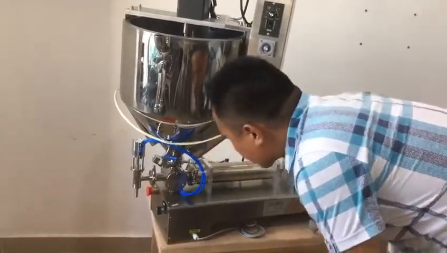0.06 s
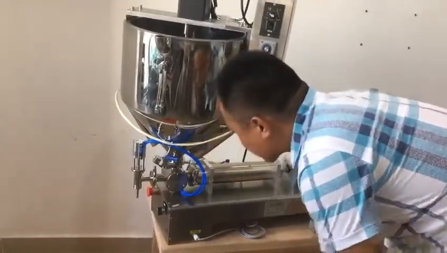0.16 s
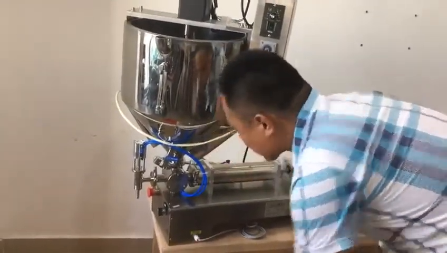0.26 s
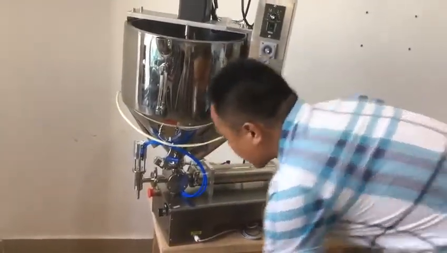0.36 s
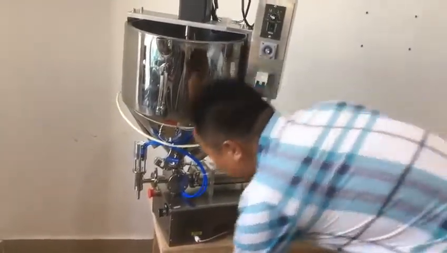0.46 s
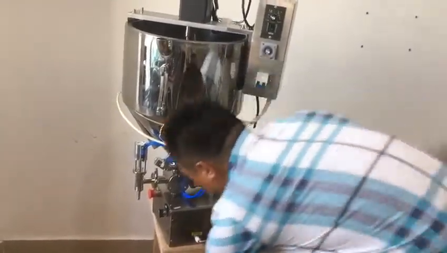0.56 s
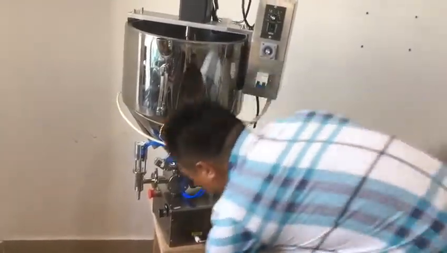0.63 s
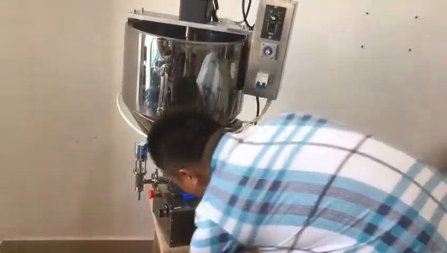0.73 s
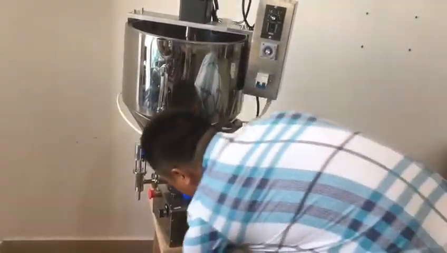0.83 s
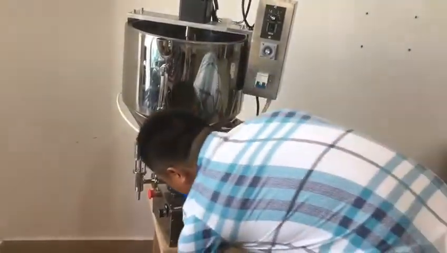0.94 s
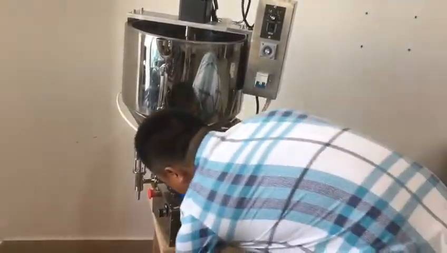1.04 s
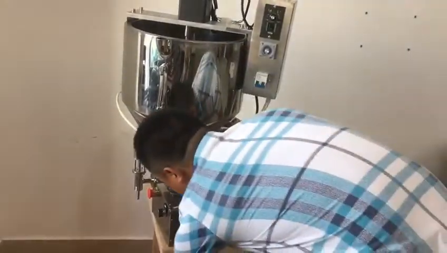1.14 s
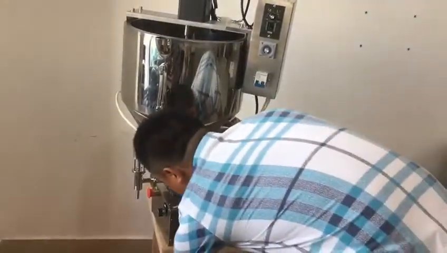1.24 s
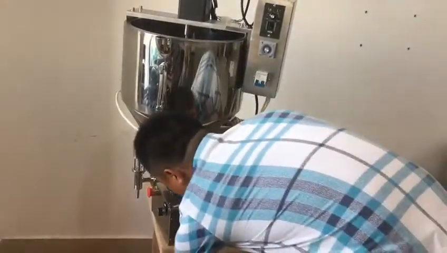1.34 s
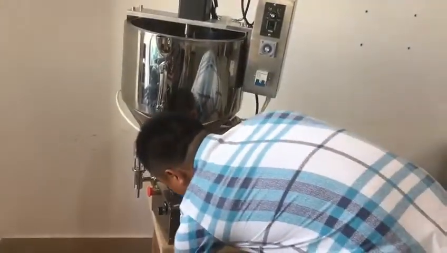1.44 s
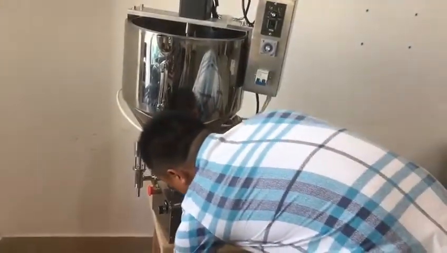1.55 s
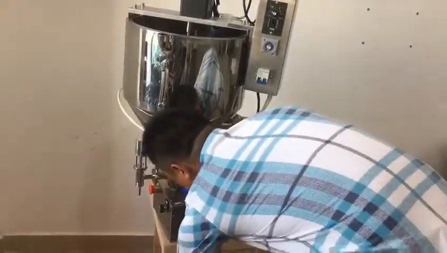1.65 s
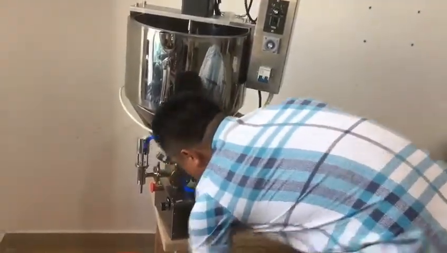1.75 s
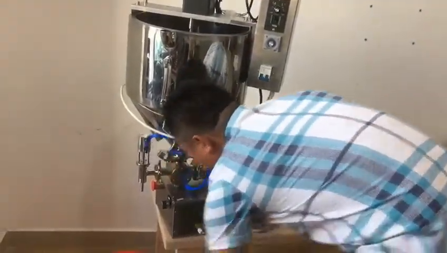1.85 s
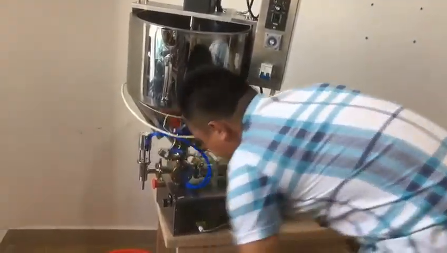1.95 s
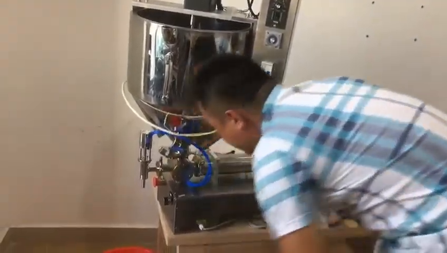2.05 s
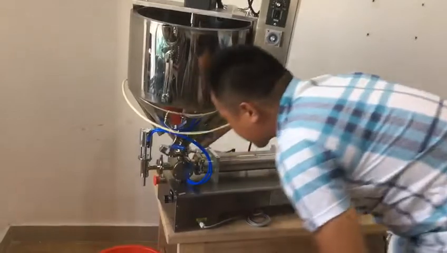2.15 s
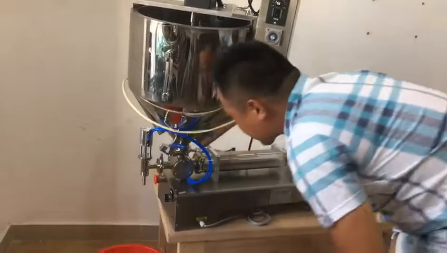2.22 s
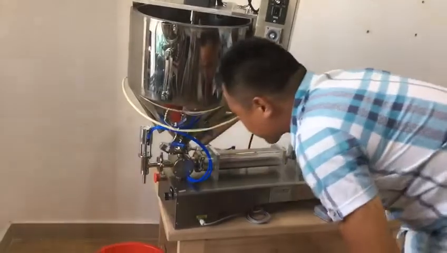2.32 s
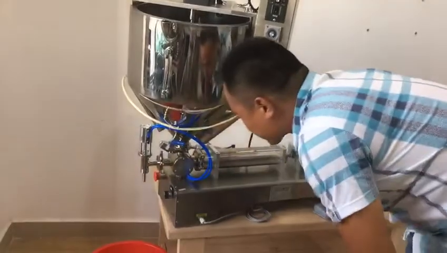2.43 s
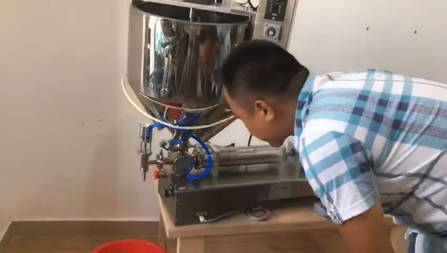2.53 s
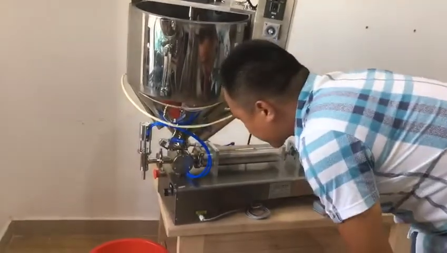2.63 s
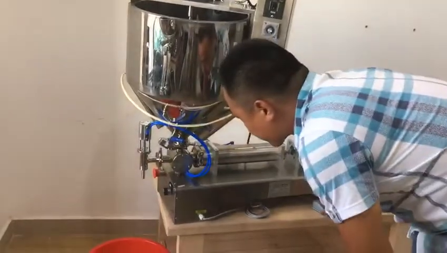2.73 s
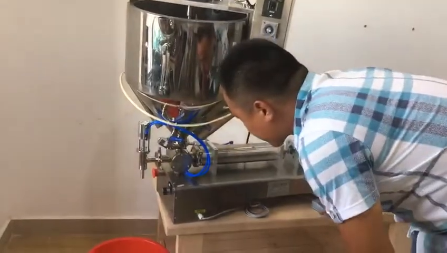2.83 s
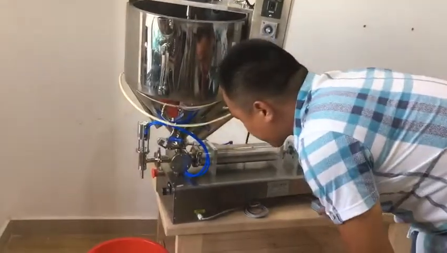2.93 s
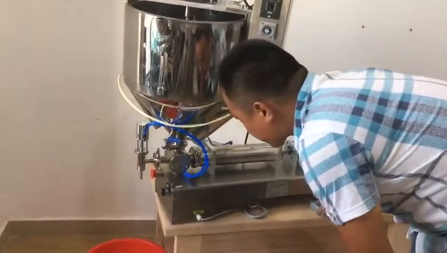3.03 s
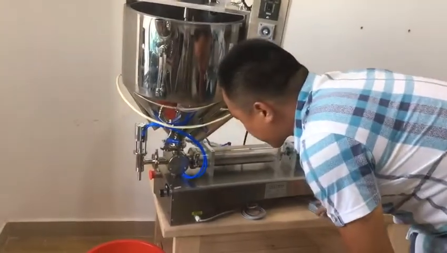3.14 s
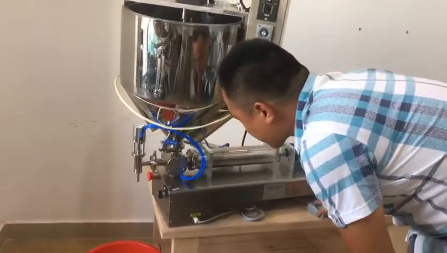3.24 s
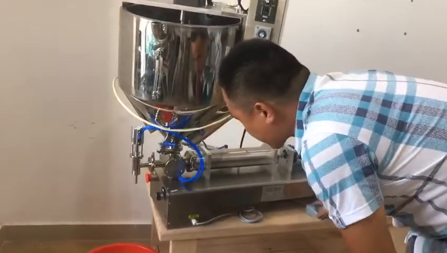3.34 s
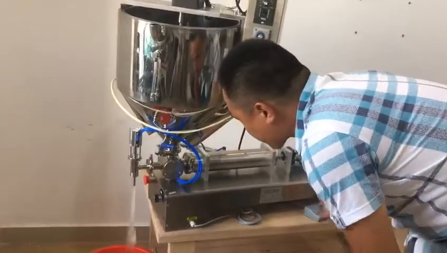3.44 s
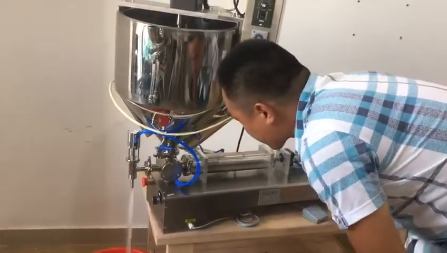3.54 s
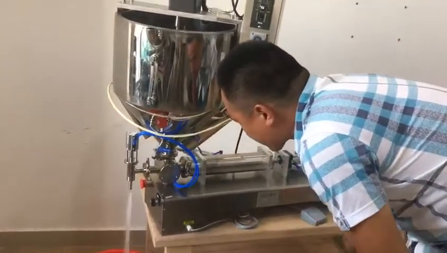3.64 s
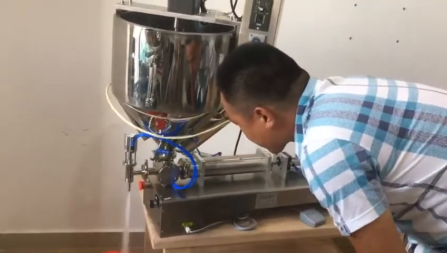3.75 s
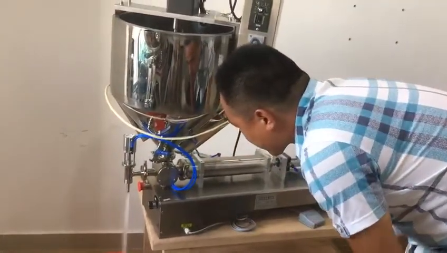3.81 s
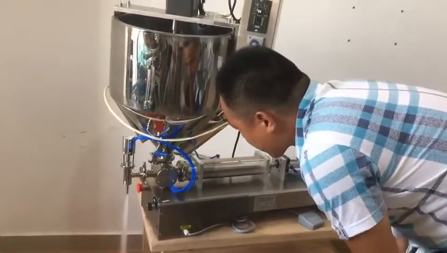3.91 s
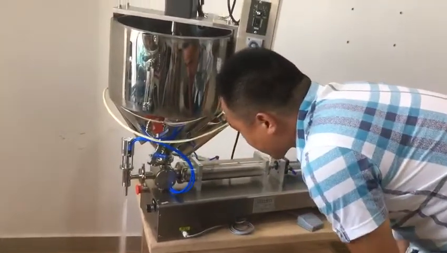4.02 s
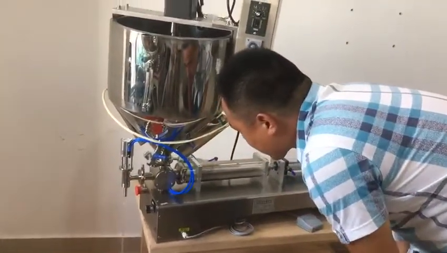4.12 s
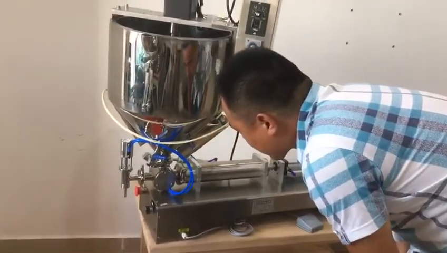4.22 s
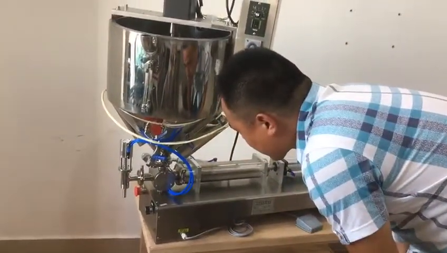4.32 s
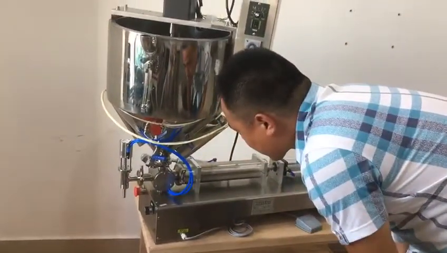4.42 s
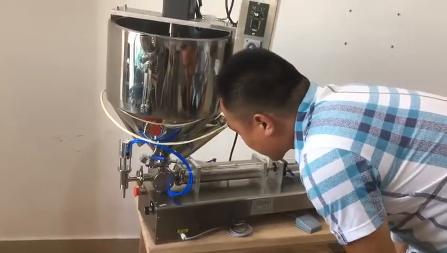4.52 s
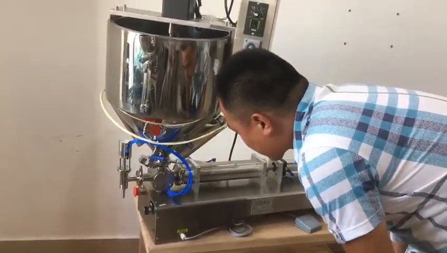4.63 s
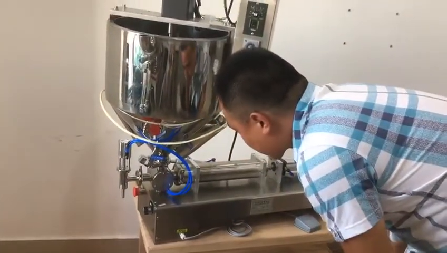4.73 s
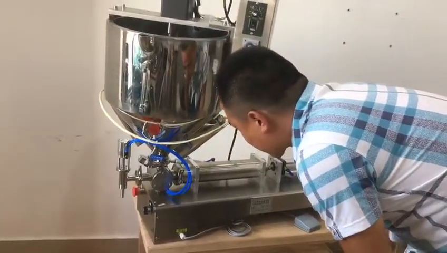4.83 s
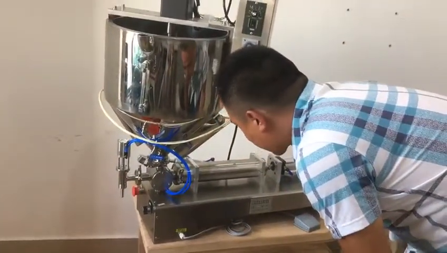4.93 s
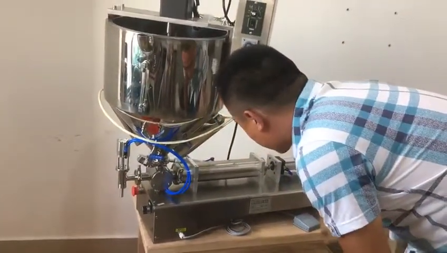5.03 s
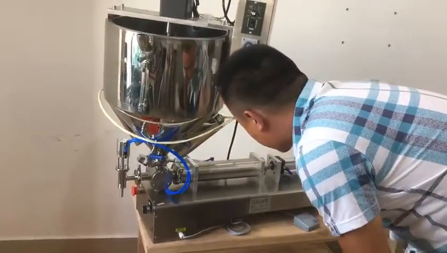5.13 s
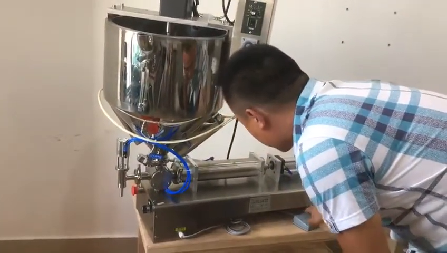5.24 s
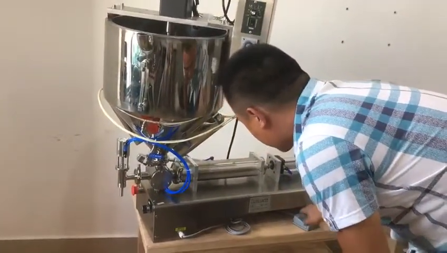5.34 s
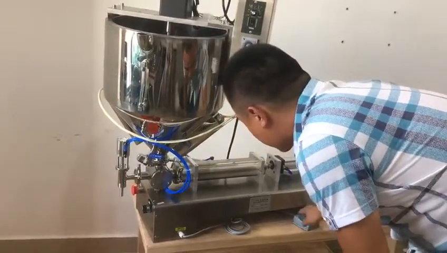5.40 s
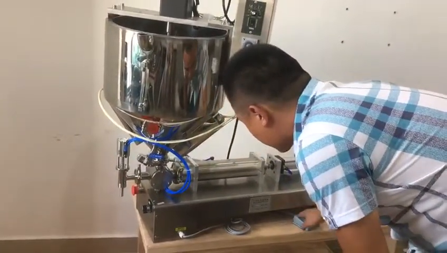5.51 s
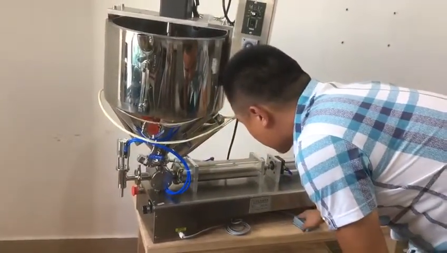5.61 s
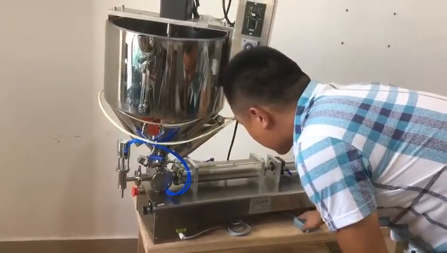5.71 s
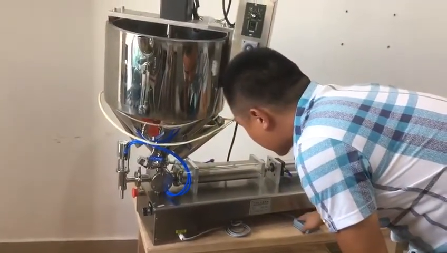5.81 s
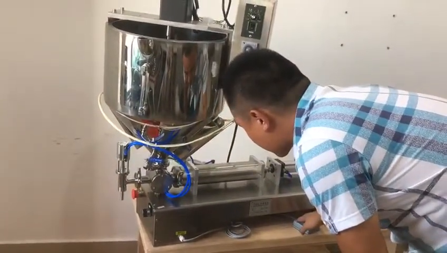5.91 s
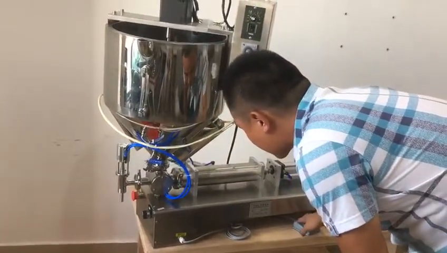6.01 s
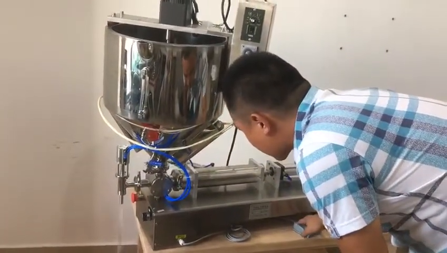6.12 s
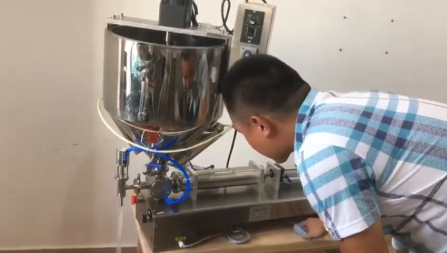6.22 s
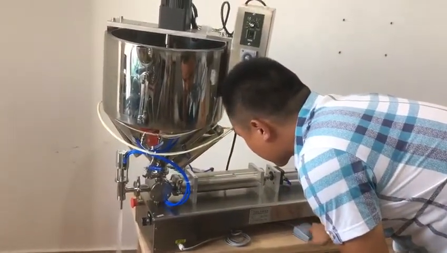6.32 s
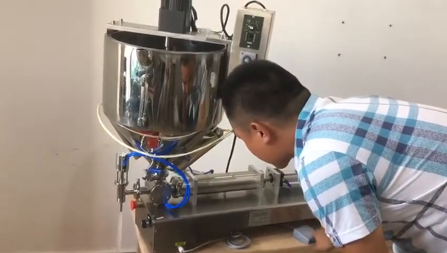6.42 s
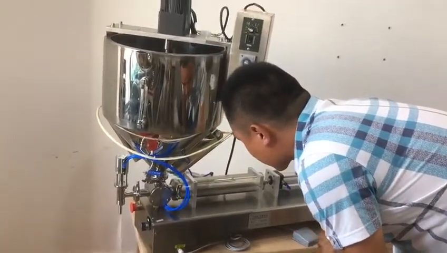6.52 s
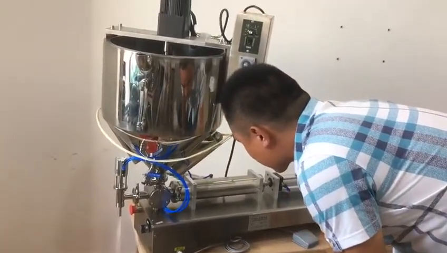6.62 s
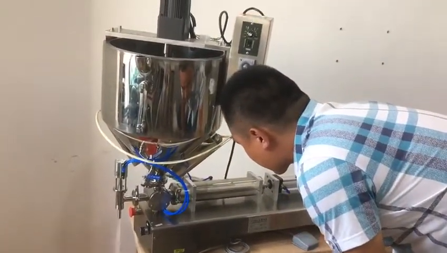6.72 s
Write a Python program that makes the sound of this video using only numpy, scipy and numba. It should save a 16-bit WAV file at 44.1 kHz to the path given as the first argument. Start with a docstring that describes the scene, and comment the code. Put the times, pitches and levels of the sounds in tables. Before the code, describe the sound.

In a bare, reverberant room with a low steady murmur, a plastic bucket bumps hollowly on the floor and a metal fitting clinks. A pedal clicks, compressed air blasts, and a valve slams with a metallic ring. Air hisses, then a short water jet booms and gulps into the bucket. After a quiet pause with dull knocks, the cycle repeats. The microphone is a few steps away.

```python
"""A bare, echoing room with an air-driven piston filler; a plastic bucket bumps down and something metal clinks.
Twice a pedal clicks, the air valve fires with a blast and the rotary valve slams: filtered noise and ringing modes.
The cylinder then hisses (coloured noise) while a water jet plunges into the bucket: a wobbling low tone booms,
rising sines gulp, and thousands of tiny chirps make splash and spray. The building murmurs steadily underneath."""
import sys
import numpy as np
from scipy import signal
from scipy.fft import rfft, irfft, next_fast_len
from scipy.io import wavfile
from numba import njit

SR = 44100
rng = np.random.default_rng(int(sys.argv[2]) if len(sys.argv) > 2 else 0)


def persist_wave(psi):
    """Save psi, clipped to +-1, as 16-bit WAV."""
    counts = np.round(np.clip(psi, -1, 1) * 32767).astype(np.int16)
    wavfile.write(sys.argv[1], SR, np.atleast_2d(counts).T)


N = 298201
T = np.arange(N) / SR
AGE = T[:SR]  # time since a blow, in seconds

# Levels are relative, within each layer. Ring time (t60) is the time to fall by 60 dB.
# water jet, one row a shot: start t/s, length/s, boom level/dB, splash level/dB, spray level/dB
JET_SHOTS = [(3.569, .66, -21, -22.5, -36.5), (6.3, .68, -18.5, -26, -39)]
# the biggest air pockets collapse under the jet: t/s, starting pitch f/Hz, level/dB, t60/s
GULPS = [(3.794, 270.2, -6, 0.16), (3.947, 268, -15, 0.11), (4.030, 248, -13.5, 0.087),
         (4.105, 274, -12.5, 0.14), (4.219, 269.7, -17, 0.2), (4.375, 276, -21, 0.17),
         (6.370, 285, -11.5, 0.13), (6.461, 307, -5, 0.068), (6.516, 306, -3.5, 0.075),
         (6.538, 295, -9.5, 0.053), (6.703, 280, -8, 0.18)]
# air spits out of the nozzle with the water: start t/s, length/s, level/dB
SPITS = [(3.585, 0.03, -38), (3.775, 0.023, -37.5), (4.05, 0.097, -31.5), (6.288, 0.024, -33.5)]
# resonances of the bucket's hollow: f/Hz, width/Hz, level/dB
HOLLOW_PEAKS = [(165, 7.9, 2.5), (220, 25, -9.5), (277.1, 18, 10.5), (309.4, 9.3, 0.5), (350, 36, 8.5)]
# resonances in the splash: f/Hz, width/Hz, level/dB
SPLASH_PEAKS = [(616, 59, 4), (827, 60, -4), (979, 22, 0), (1070, 19, -2)]
# splash spectrum: f/Hz, level/dB
SPLASH_SPECTRUM = [(45, -52), (95, -24), (160, -5), (400, 4), (500, -2), (620, 0), (1000, 1), (1400, -1.5),
                   (2000, -8), (3000, -13.5), (9000, -40)]
# spectrum of spray, also used for the last puff of air: f/Hz, level/dB
SPRAY_SPECTRUM = [(1200, 7), (2500, 1.5), (5000, 0), (7500, 0.5), (10000, 1.5), (12000, -3)]
# piston travels (push, return, push): start t/s, length/s, broad rush level/dB, throttle hiss level/dB
TRAVELS = [(3.024, 1, -34.5, -39), (4.243, 0.57, -44, -37.5), (5.89, 0.88, -34, -41)]
# rushing air spectrum: f/Hz, level/dB
RUSH_SPECTRUM = [(80, -15), (300, 3.5), (500, -13), (700, -1.5), (2000, 1.5), (2800, 1.5), (3900, 3),
                 (5000, -3), (7000, -9.5), (10000, -23.5), (12000, -17.5)]
# throttle hiss spectrum: f/Hz, level/dB
THROTTLE_SPECTRUM = [(200, -17), (700, -12.5), (1900, 5.5), (2900, -3.5), (4000, -1), (7000, -3.5),
                     (9000, -7.5), (10200, -28.5), (11200, -9.5), (12200, -34.5)]
# resonances of the throttle's narrow passages: f/Hz, width/Hz, level/dB
THROTTLE_PEAKS = [(3590, 130, 4.6), (3700, 41, 2.4), (4430, 170, 8.6), (4700, 60, 3), (5430, 180, 5.8),
                  (5730, 60, 4), (6130, 140, 3.5), (6870, 130, 7.1), (8700, 60, 4.5)]
# low modes of the table: f/Hz, level/dB, t60/s
TABLE_MODES = [(78, -6.5, 0.4), (95.4, -3.5, 0.27)]
# air valve fires: t/s, lead of the first leak/s, blast level/dB, clack level/dB, ping f/Hz, ping level/dB
VALVE_SHOTS = [(3.008, .010, -24.5, -24.5, 2004, -27), (5.878, .006, -24, -26.5, 2024, -21.5)]
# blast of air spectrum: f/Hz, level/dB
BLAST_SPECTRUM = [(200, 0), (700, -1.5), (1500, -4.5), (2800, -5), (3900, 1), (4800, -4), (5700, 1.5),
                  (7700, -7), (9400, -2.5), (11000, -1.5), (12500, -13.5)]
# resonances in the blast; the first two also colour the rush: f/Hz, width/Hz, level/dB
BLAST_PEAKS = [(2013, 49, 1.5), (3728, 50, 1.5), (4200, 79, -1), (5360, 120, -5), (9200, 300, 0),
               (11050, 200, -5)]
# air valve clack spectrum: f/Hz, level/dB
VALVE_CLACK_SPECTRUM = [(55, -18), (90, 7), (140, -5), (280, 2.5), (400, -4), (500, -19.5), (680, -3),
                        (1000, -5.5), (1500, -7), (2100, -4.5), (4000, -14.5), (11000, -43)]
# rotary valve hits its stop: t/s, level/dB
SLAMS = [(3.155, -11), (6.021, -10.5)]
# slam spectrum: f/Hz, level/dB
SLAM_SPECTRUM = [(50, -27.5), (120, -6.5), (175, -1.5), (260, 3), (390, 2.5), (480, -12.5), (680, -1.5),
                 (1700, -4), (2500, -9.5), (4800, -16), (9000, -11), (12000, -23.5)]
# sharp crack of the slam, spectrum: f/Hz, level/dB
CRACK_SPECTRUM = [(1000, -8), (5000, -12.5), (6800, 2), (9000, -8.5), (12000, -22)]
# modes of the steel frame: f/Hz, level/dB, t60/s
FRAME_MODES = [(119.5, -6, 0.36), (239.3, 1, 0.41), (267, -5, 0.45), (292.6, -4, 0.51), (363, -11.5, 0.54),
               (407, -11.5, .75), (665, -11, 0.49), (755, -16.5, 0.25), (1165, -20.5, 0.24),
               (1690, -3.5, .26), (1782, -28, .4), (2375, -18.5, 0.4), (2740, -23.5, .26),
               (3560, -9.5, .21)]
# pedal switch clicks: t/s, level/dB
PEDAL_CLICKS = [(2.970, -37), (5.825, -43)]
# modes of the pedal's case: f/Hz, level/dB, t60/s
PEDAL_MODES = [(1040, -2.5, .12), (1110, -3.5, .2), (2010, -11, 0.12), (2680, -12, 0.16)]
# the pedal's spring squeaks: start t/s, length/s, pitch f/Hz, level/dB
SQUEAKS = [(5.741, 0.066, 2299, -57.5), (6.6, 0.1, 2600, -64), (5.737, .13, 2900, -68)]
# bucket bumps on the floor: t/s, level/dB, hollow boom level/dB, brightness in dB per octave
BUMPS = [(0.807, -45.5, 1, 3.5), (.837, -33, -1.5, 0.5), (.869, -23, 0.5, -1), (.886, -33.5, 1.5, 0.5),
         (.985, -43, 3, 0), (1.543, -23.5, 3.5, 1.5), (1.560, -23.5, 3.5, 0.5), (1.648, -31.5, -1, -1),
         (1.815, -44.5, 5, 4)]
# bump spectrum: f/Hz, level/dB
BUMP_SPECTRUM = [(50, -19), (130, 5), (300, 3), (430, -4.5), (750, -1.5), (1100, -1.5), (1700, -8),
                 (3000, -20), (5000, -31), (11000, -48)]
# modes of the bucket: f/Hz, level/dB, t60/s
BUCKET_MODES = [(146.5, -14.5, 0.48), (206.8, -5.5, 0.62), (265.6, 0, 0.43), (284.6, -1.5, 0.49),
                (331.5, -10.5, 0.4), (598, -20, 0.69), (730, -15, 0.61), (853, -27, 0.5)]
# plastic clacks: t/s, level/dB, brightness in dB per octave
CLACKS = [(1.408, -28, -1), (1.432, -36, -11)]
# plastic clack spectrum: f/Hz, level/dB
CLACK_SPECTRUM = [(80, -22), (200, -4.5), (290, 3), (420, -18), (560, -8), (850, -10), (1020, 6),
                  (1280, -7.5), (1600, -15.5), (2400, -19.5), (4000, -39), (11000, -59)]
# soft dull knocks: t/s, level/dB
KNOCKS = [(1.256, -44.5), (5.259, -39.5), (5.281, -43), (5.35, -46.5)]
# knock spectrum: f/Hz, level/dB
KNOCK_SPECTRUM = [(90, -2), (200, 8), (330, 5), (470, -6), (650, 2.5), (950, -3), (1300, -17),
                  (2500, -28.5), (8000, -35)]
# faint sharp ticks of handling: t/s, level/dB
TICKS = [(1.185, -50.5), (1.496, -48), (1.745, -50), (1.818, -53), (1.915, -45), (2.204, -43), (5.662, -56)]
# tick spectrum: f/Hz, level/dB
TICK_SPECTRUM = [(800, -15), (3000, 4), (5000, -7), (11000, -16.5)]
# modes of the clinking metal: f/Hz, level/dB, t60/s
CLINK_MODES = [(1240, -11, 0.23), (1254, -7, .4), (2400, 3.5, 0.089), (2420, -1, 0.25), (2490, -6, 0.32),
               (2530, -12, 0.47), (3660, -15, 0.44), (3700, -10, 0.35), (3750, -14, 0.33),
               (6170, -15, 0.062)]
# the shirt rustles with each move: start t/s, length/s, level/dB
RUSTLES = [(.08, .25, -59), (0.445, .08, -69), (0.735, .24, -64), (1.574, .15, -59), (2.077, .08, -59.5),
           (2.356, .07, -58.5)]
# cloth spectrum: f/Hz, level/dB
CLOTH_SPECTRUM = [(1000, 6.5), (3000, 2), (7000, -5.5), (11000, -13)]
# murmur of the building, spectrum: f/Hz, level/dB
AMBIENT_SPECTRUM = [(15, -47), (25, -29), (49, -0.5), (118, -5.5), (197, -3), (323, -11), (555, -16),
                    (682, -15), (906, -12.5), (979, -13.5), (1170, -14.5), (2360, -26), (4990, -40.5),
                    (9510, -41), (12000, -50), (15600, -79.5), (22000, -120)]

# the jet builds up, then thins out; the boom fades slowest
JET_RISE_S, SPLASH_RISE_S = 0.046, 0.081
BOOM_FALL_DB_PER_S, SPLASH_FALL_DB_PER_S, SPRAY_FALL_DB_PER_S = 67, 83, 72
BOOM_GROWTH_DB_PER_S = 6.5  # the cavity deepens while the jet runs
SPIT_RISE_S, SPIT_FALL_DB_PER_S = 0.035, 253
# the cavity's pitch climbs and settles as the bucket fills
SHALLOW_HZ, DEEP_HZ, SETTLE_S = 185, 308.5, .42
# the rush comes at once and sags; the throttle hisses as the piston gathers speed
RUSH_RISE_S, RUSH_SAG_DB_PER_S, HISS_RISE_S, AIR_FALL_DB_PER_S = 0.023, 4, 0.37, 74
# the last air escapes after the return
PUFF_S, PUFF_LENGTH_S, PUFF_DB = 4.965, 0.048, -49
PUFF_RISE_S, PUFF_FALL_DB_PER_S = 0.022, 171
THUD_S, THUD_DB = 4.078, -34.5  # low thud around the end of the first push
SLAM_BUILD_CYCLES = 5
CLINK_S, CLINK_DB = 2.202, -35.5
RUSTLE_RISE_S, RUSTLE_FALL_DB_PER_S = 0.053, 48
AMBIENT_DB = -49.5
ROOM_T60_S, ROOM_DAMP = 0.85, 0.2  # damping: how much faster each higher octave dies
TOP_HZ = 11900


def water(boom_db=-6, hollow_db=-8, splash_db=0.0, spray_db=-2, wobble_hz=52):
    """The jet digs a throbbing cavity that sounds the bucket's hollow; small bubbles splash and droplets spray."""
    booming, splashing, spraying, cavity_hz = jet()
    # the cavity keeps changing size, so its pitch wobbles fast
    pitch = cavity_hz + wobble_hz * walk(190)
    tone = np.sin(2 * np.pi * np.cumsum(pitch) / SR)
    cavity = unit(amp(3.8 * walk(70)) * tone)
    hz = np.fft.rfftfreq(N, 1 / SR)
    hollow = unit(irfft(rfft(cavity) * resonate(HOLLOW_PEAKS, hz), N))
    out = room(booming * (amp(boom_db) * cavity + amp(hollow_db) * hollow), -9)

    for s, gulp_hz, db, t60 in GULPS:
        onset = (1 - np.exp(-AGE / 0.0031)) ** 2
        rising_tone = np.sin(2 * np.pi * gulp_hz * AGE * (1 + 0.32 * AGE))
        add(out, s, 2 * amp(db) * onset * fade(t60) * rising_tone)

    splash = bubbles(348, 4430, count=9000, cycles=18.8, spread_db=3.5, glide=0.2)
    splash = room(splash * amp(2.4 * walk(35)), 1)
    out += amp(splash_db) * splashing * colour(splash, SPLASH_SPECTRUM, SPLASH_PEAKS)

    spray = bubbles(1800, 12500, count=20000, cycles=6.2, spread_db=3, glide=0.11)
    spray = colour(spray, SPRAY_SPECTRUM)
    return out + amp(spray_db) * room(spraying * amp(1.5 * walk(30)) * spray, 1)


def jet():
    """Strength of boom, splash and spray through the shots, and the cavity's pitch as the water deepens."""
    boom = splash = spray = poured_s = 0
    for s, length, boom_db, splash_db, spray_db in JET_SHOTS:
        boom_swell = swell(s, length, JET_RISE_S, BOOM_FALL_DB_PER_S, BOOM_GROWTH_DB_PER_S)
        splash_swell = swell(s, length, SPLASH_RISE_S, SPLASH_FALL_DB_PER_S)
        splash_swell = splash_swell * np.clip((T - s) / SPLASH_RISE_S, 0, 1)  # a gentler start
        boom = boom + amp(boom_db) * boom_swell
        splash = splash + amp(splash_db) * splash_swell
        spray = spray + amp(spray_db) * swell(s, length, JET_RISE_S, SPRAY_FALL_DB_PER_S)
        poured_s = poured_s + np.clip(T - s, 0, length)
    for s, length, db in SPITS:
        spray = spray + amp(db) * swell(s, length, SPIT_RISE_S, SPIT_FALL_DB_PER_S)
    cavity_hz = DEEP_HZ + (SHALLOW_HZ - DEEP_HZ) * np.exp(-poured_s / SETTLE_S)
    return boom, splash, spray, cavity_hz


def bubbles(low_hz, high_hz, count, cycles, spread_db, glide):
    """Bubbles at random moments, a few much stronger than the rest; high ones start louder but die sooner."""
    when, pitch, luck = rng.random((count, 3)).T
    hz = low_hz * (high_hz / low_hz) ** pitch
    size = hz / low_hz * amp(-spread_db * np.log(np.maximum(luck, .01)))
    start = (when * N).astype(np.int64)
    return chirps(start, hz, size, float(max(cycles, 1)), float(glide))


@njit
def chirps(start, hz, size, cycles, glide):
    """Decaying sines that rise in pitch by the fraction glide, each some cycles long."""
    out = np.zeros(N)
    for k in range(len(hz)):
        life = cycles * SR / hz[k]  # in samples
        turn = 2 * np.pi * hz[k] / SR
        z = size[k] + 0j
        step = np.exp(1j * turn - np.log(200) / life)  # turns and shrinks z
        rise = np.exp(1j * turn * glide / life)  # speeds up the turning
        for i in range(start[k], min(N, start[k] + int(life))):
            z *= step
            step *= rise
            out[i] += z.imag
    return out


def cylinder():
    """Air rushes out as the piston travels and hisses in the throttle's narrow passages; then a thud and a puff."""
    rush = hiss = 0
    for s, length, rush_db, hiss_db in TRAVELS:
        rush_swell = swell(s, length, RUSH_RISE_S, AIR_FALL_DB_PER_S, -RUSH_SAG_DB_PER_S)
        rush = rush + amp(rush_db) * rush_swell
        hiss = hiss + amp(hiss_db) * swell(s, length, HISS_RISE_S, AIR_FALL_DB_PER_S)
    air = rush * noise(RUSH_SPECTRUM, peaks=BLAST_PEAKS[:2])
    air = air + hiss * noise(THROTTLE_SPECTRUM, peaks=THROTTLE_PEAKS)
    puff = swell(PUFF_S, PUFF_LENGTH_S, PUFF_RISE_S, PUFF_FALL_DB_PER_S)
    puff = amp(PUFF_DB) * puff * noise(SPRAY_SPECTRUM)
    out = amp(-4.0) * room(air * amp(1.4 * walk(23)), 1.8) + room(puff, -2)
    add(out, THUD_S, amp(THUD_DB) * ring(TABLE_MODES, 0.0066))
    return out


def valves(blast_hold_s=.19, blast_t60=1.6, vent_t60=.4, leak_db=-16, frame_db=-2, crack_db=1):
    """The spool clacks and dumps the actuator's air; then the rotary valve slams and shakes the steel frame."""
    out = np.zeros(N)
    for s, leak_s, blast_db, clack_db, ping_hz, ping_db in VALVE_SHOTS:
        # the port leaks just before it opens fully; pressure sags, then runs out
        opening = np.where(AGE < leak_s, amp(leak_db), 1)
        venting = np.exp(-np.log(1000) * np.maximum(AGE - blast_hold_s, 0) / vent_t60)
        pressure = fade(blast_t60) * venting
        blast = opening * pressure * noise(BLAST_SPECTRUM, size=SR, peaks=BLAST_PEAKS)
        add(out, s - leak_s, amp(blast_db) * blast)
        # the spool rings in three close modes
        ping = ring([(ping_hz * ratio, 0, .27) for ratio in (.982, 1, 1.02)], 0.00091)
        clack = clatter(VALVE_CLACK_SPECTRUM, .3, 0, build_cycles=1.0)
        add(out, s + 0.00205, amp(clack_db) * clack + amp(ping_db) * ping)
        add(out, s, amp(clack_db - 6.5) * ring(TABLE_MODES, .006))  # the kick shakes the table
    for s, db in SLAMS:
        crack = amp(crack_db) * fade(0.02) * noise(CRACK_SPECTRUM, size=SR)
        body = clatter(SLAM_SPECTRUM, 0.4, -11.5, build_cycles=SLAM_BUILD_CYCLES)
        frame = amp(frame_db) * ring(FRAME_MODES, 0.021)
        add(out, s, amp(db) * (crack + body + frame))
    return out


def pedal(tick_db=-12):
    """The spring squeaks as a wavering sine; the switch snaps over and rings its case."""
    out = np.zeros(N)
    for s, length, hz, db in SQUEAKS:
        rub = np.clip(AGE / .006, 0, 1) * np.exp(-np.maximum(AGE - length, 0) / .012)
        tone = np.sin(2 * np.pi * hz * AGE + .6 * walk(60)[:SR])
        add(out, s, amp(db + 2 * walk(70)[:SR]) * rub * tone)
    for s, db in PEDAL_CLICKS:
        tick = amp(tick_db) * clatter(TICK_SPECTRUM, 0.04, -9.5)
        add(out, s, amp(db) * (ring(PEDAL_MODES, .0006) + tick))
    return out


def handling(boom_build_s=0.0066, bump_t60=0.22, bump_room_db=-10, clack_room_db=-5):
    """Blows make the bucket bump and boom, plastic clack and a metal fitting clink; cloth rustles as noise."""
    out = np.zeros(N)
    for s, db, boom_db, tilt_db in BUMPS:
        bump = clatter(BUMP_SPECTRUM, bump_t60, bump_room_db, tilt_db, build_cycles=0.57)
        boom = amp(boom_db) * ring(BUCKET_MODES, boom_build_s)
        add(out, s, amp(db) * (bump + boom))
    for s, db, tilt_db in CLACKS:
        add(out, s, amp(db) * clatter(CLACK_SPECTRUM, 0.14, clack_room_db, tilt_db, build_cycles=0.47))
    for s, db in KNOCKS:
        add(out, s, amp(db) * clatter(KNOCK_SPECTRUM, 0.23, -8.5, build_cycles=0.48))
    for s, db in TICKS:
        add(out, s, amp(db) * clatter(TICK_SPECTRUM, 0.033, -16))
    clink = np.zeros(N)
    add(clink, CLINK_S, amp(CLINK_DB) * ring(CLINK_MODES, 0.00083))
    out += room(clink, -8.5)
    moves = 0
    for s, length, db in RUSTLES:
        moves = moves + amp(db) * swell(s, length, RUSTLE_RISE_S, RUSTLE_FALL_DB_PER_S)
    return out + moves * amp(3.5 * walk(60)) * noise(CLOTH_SPECTRUM)


def murmur():
    """The building's steady murmur: coloured noise whose level drifts slightly."""
    return amp(AMBIENT_DB) * amp(.5 * walk(3.3)) * noise(AMBIENT_SPECTRUM)


def room(x, wet_db):
    """Direct sound plus the diffuse answer of bare walls."""
    tail = clatter([(100, 5.5), (3000, -3.5), (12000, -2.0)], 0.15, -7.5)
    return x + amp(wet_db) * signal.fftconvolve(x, tail / np.linalg.norm(tail))[:N]


def clatter(spectrum, t60, room_db, tilt_db=0, build_cycles=2):
    """Countless modes of a struck body: highs die first, lows build up late, and the room holds a tail."""
    hz = np.fft.rfftfreq(SR, 1 / SR)
    octave = np.log2((hz + 1) / 1000)  # octaves above 1 kHz
    gain = shape(spectrum, hz) * amp(tilt_db * octave)
    body = rfft(unit(irfft(rfft(rng.standard_normal(SR)) * gain)))
    out = 0
    for k in range(-4, 5):  # overlapping bands, one an octave
        band = irfft(body * np.maximum(1 - abs(octave - k), 0))
        life = 2 ** (-ROOM_DAMP * max(k, 0))
        build = 1 - np.exp(-AGE * 1000 * 2. ** k / build_cycles)
        tail = amp(room_db) * fade(ROOM_T60_S * life)
        out = out + band * build * np.hypot(fade(t60 * life), tail)
    return out


def ring(modes, build_s):
    """The strongest modes as decaying sines, a little different on each blow."""
    hz, db, t60 = np.transpose(modes)
    chance = rng.standard_normal((len(hz), 2))
    waves = 0
    for f, d, life, (detune, phase) in zip(hz, db, t60, chance):
        tone = np.sin(2 * np.pi * (f * (1 + 0.0036 * detune) * AGE + phase))
        waves = waves + amp(d) * fade(life) * tone
    return waves * (1 - np.exp(-AGE / build_s)) / np.sqrt(np.sum(amp(db) ** 2) / 2)


def swell(s, length, rise_s, fall_db_per_s, slope_db_per_s=0):
    """Gain that rises from time s, holds (on a slope about its middle) and dies away."""
    age = T - s
    held = np.clip(age, 0, length) - length / 2
    fall_db = fall_db_per_s * np.maximum(age - length, 0)
    return np.clip(age / rise_s, 0, 1) * amp(slope_db_per_s * held - fall_db)


def noise(spectrum, size=N, peaks=()):
    """Coloured turbulence."""
    return colour(rng.standard_normal(size), spectrum, peaks)


def colour(x, spectrum, peaks=()):
    """Give x a spectrum with resonances on top; rms 1."""
    size = next_fast_len(len(x), True)
    hz = np.fft.rfftfreq(size, 1 / SR)
    response = shape(spectrum, hz) * (1 + resonate(peaks, hz))
    return unit(irfft(rfft(x, size) * response, size)[:len(x)])


def shape(spectrum, hz):
    """Gain of a spectrum at the given frequencies, thinning out in the bass."""
    points, db = np.transpose(spectrum)
    bass_cut = hz / np.hypot(hz, points[0] / 2)
    return amp(np.interp(np.log(hz + 1), np.log(points), db)) * bass_cut


def resonate(peaks, hz):
    """Complex response of a set of resonances."""
    return sum(amp(db) * 1j * hz * w / (f * f - hz * hz + 1j * hz * w) for f, w, db in peaks)


def walk(rate):
    """Smooth chance: random values, rate a second, joined by straight lines."""
    return np.interp(T * rate, np.arange(4096), rng.standard_normal(4096))


def fade(t60):
    """Exponential decay after a blow."""
    return np.exp(-np.log(1000) * AGE / max(t60, .002))


def amp(db):
    """Decibels to gain."""
    return 10 ** (np.asarray(db) / 20)


def unit(x):
    """Scale to rms 1."""
    return x / np.sqrt(np.mean(x ** 2))


def add(out, s, x):
    """Mix x in at time s."""
    i = int(s * SR)
    out[i:i + len(x)] += x[:N - i]


def scene():
    """Water, machine and bucket over the steady murmur of the building."""
    return (water() + cylinder() + valves() + pedal() + handling() + murmur())[None]


def record(dry):
    """Round off the loudest peaks and cut the top of the treble steeply."""
    ceiling = 0.73
    rounded = ceiling * np.tanh(dry / ceiling)
    return signal.sosfilt(signal.ellip(10, .2, 70, TOP_HZ, fs=SR, output="sos"), rounded)


dry = scene()
out = record(dry)
persist_wave(out)
```